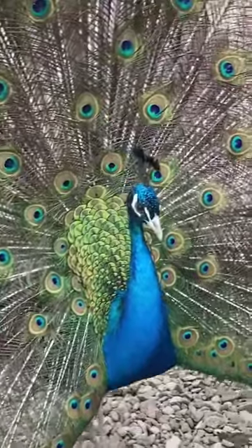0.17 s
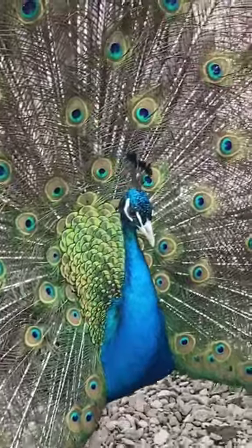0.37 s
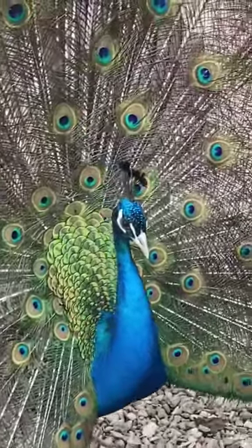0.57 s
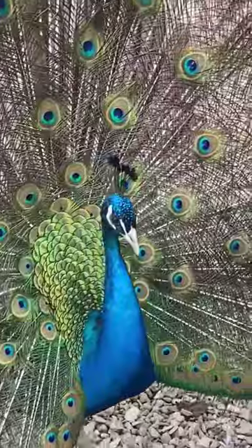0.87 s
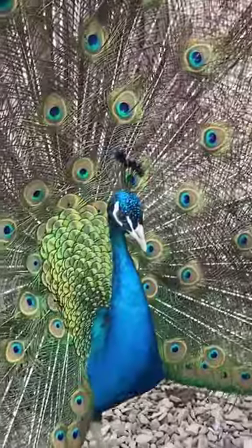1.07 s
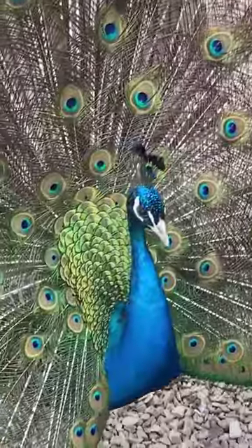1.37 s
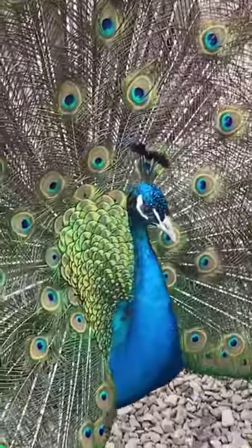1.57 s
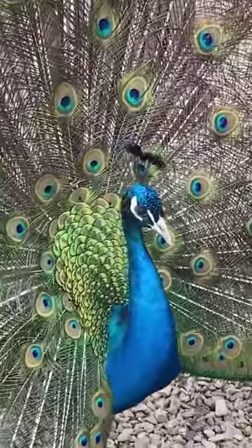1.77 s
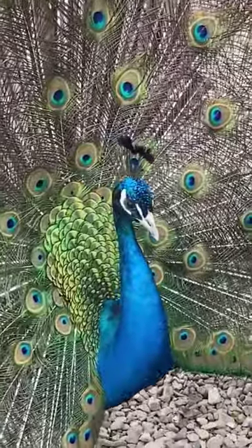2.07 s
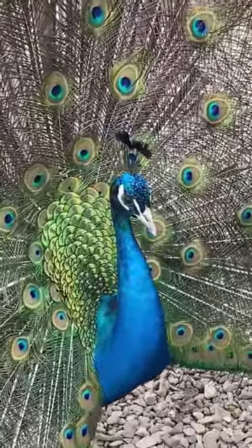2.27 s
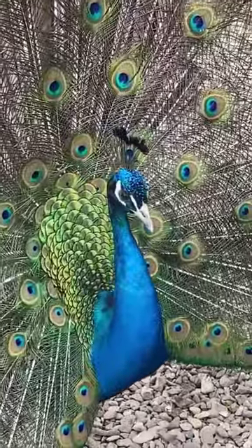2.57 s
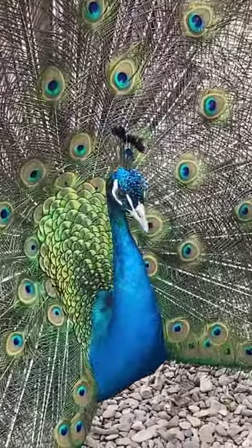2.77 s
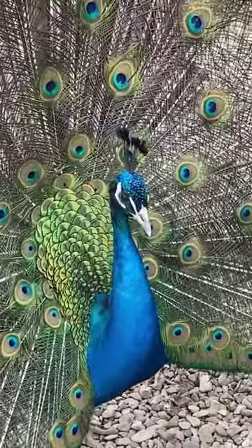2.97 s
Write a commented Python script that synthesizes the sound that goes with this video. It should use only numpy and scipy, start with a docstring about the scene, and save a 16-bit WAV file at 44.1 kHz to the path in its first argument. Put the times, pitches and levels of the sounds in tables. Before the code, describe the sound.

Peacock feathers rustle and tick drily close by while sparrows chirp around an open yard

```python
"""Throughout: a distant engine's drone, slowing slightly, the rumble of open air, a thin, high insect hiss.
At the start a far bird's hoarse note ends. Close to the microphone a peacock turns on gravel, train spread:
its feathers rustle and tick as shaped noise. Sparrows, whistles with bent pitch, then chirp around the yard,
soon joined by faint peeps, clear cheeps and, from about one second, chirps further off."""
import sys
import numpy as np
from scipy import signal
from scipy.fft import rfft, irfft, next_fast_len
from scipy.io import wavfile

SR = 44100
rng = np.random.default_rng(int(sys.argv[2]) if len(sys.argv) > 2 else 0)


def dump(signal):
    """Clip the signal to [-1, 1] and save it as 16-bit WAV at the path in sys.argv[1]."""
    limited = np.clip(np.atleast_2d(signal).T, -1, 1)
    pcm = np.round(limited * 32767).astype(np.int16)
    wavfile.write(sys.argv[1], SR, pcm)


N = 138033
T = np.arange(N) / SR

# distant engine: time_s, firing_rate_hz, level_db, octave_level_db
ENGINE_COURSE = [(0, 108.6, -36.5, -48), (.3, 106.1, -35, -39.5), (.65, 106.5, -29.5, -39.5),
                 (1.0, 107.4, -32.5, -40.5), (1.42, 106.8, -30.5, -37), (1.75, 106.5, -35, -36.5),
                 (2.2, 106.2, -35.5, -41), (2.6, 106.1, -33.5, -46), (2.93, 105.2, -30, -43),
                 (3.13, 105.2, -31, -39)]
# its weaker orders: multiple_of_firing_rate, level_re_mean_fundamental_db
ENGINE_ORDERS = [(.55, -15), (.7, -17), (1.39, -27), (2.35, -26.5), (3, -33), (5, -30.5)]
ENGINE_LAG_S, OCTAVE_LAG_S, ENGINE_PAN_DB = 0.00032, 0.001, 0.2
ENGINE_WAVER_DB, OCTAVE_WAVER_DB, ORDER_WAVER_DB, ENGINE_JITTER_HZ = 0.43, 1, 3, 0.382

# open-air spectrum: frequency_hz, relative_density_db (per Hz)
AIR_SPECTRUM = [(22, -23), (35, -6), (60, -1), (90, -3.5), (130, -7), (180, -4), (250, -9), (340, -12),
                (500, -12), (700, -18), (1300, -24), (2000, -32), (3300, -28.5), (5000, -37.5), (7500, -80),
                (11000, -84), (15000, -102.5)]
# swell below 120 Hz: time_s, gain_db
BASS_SWELL = [(0, 3), (.3, -0.5), (.65, 6), (.8, -6.5), (1.0, -4), (1.4, 5.5), (1.75, 0.5), (2.0, 1.5),
              (2.35, 1.5), (2.55, 2), (2.9, -2.5), (3.13, 3)]
# swell between 120 and 400 Hz: time_s, gain_db
RUMBLE_SWELL = [(0, 0), (.7, 0), (1.0, 1.5), (1.3, 3.5), (1.8, 1.5), (2.4, -2.5), (2.9, 3), (3.13, 3.5)]
# swell from 400 Hz up: time_s, gain_db
UPPER_SWELL = [(0, 1.5), (.5, 1.5), (1.0, 1.5), (1.8, 0), (3.13, 0)]
# left-right likeness of the air: frequency_hz, correlation (-1 to 1)
SIDE_LIKENESS = [(30, 1), (80, 0.78), (140, 0.96), (250, 0.24), (400, 0.31), (650, -0.69), (1100, 0.14),
                 (1600, 0.074), (2500, -0.16), (5000, 0.12), (15000, -0.22)]
AIR_DB, AIR_FLICKER_DB = -36, 1.5

# insect chorus: centre_hz, width_hz, level_db
INSECT_BANDS = [(5720, 440, -56), (6542, 580, -49.5), (7070, 370, -56)]
INSECT_FLICKER_DB = 1.7

# far bird's hoarse note, its partials: pitch_hz, level_db
HOARSE_PARTIALS = [(764, -56.5), (1150, -62), (1435, -53), (2010, -53), (2280, -53)]
HOARSE_END_S, HOARSE_RELEASE_S = .185, .035
HOARSE_WAVER, HOARSE_SAG_PER_S = .01, .25  # fractions of the pitch
HOARSE_ROUGH_HZ, HOARSE_BREATH_DB = 55, -3.5

# feathers brush together: centre_s, length_s (between 1/e points), relative_level_db
RUSTLES = [(0.009, 0.045, -42), (0.135, 0.11, -50), (0.285, 0.18, -54), (0.502, 0.14, -50),
           (0.632, 0.058, -52.5), (0.852, 0.1, -65), (1.07, 0.026, -61), (1.188, 0.3, -61.5),
           (1.477, 0.037, -59), (1.57, 0.043, -65), (1.696, 0.23, -62), (1.92, 0.11, -57),
           (2.068, 0.12, -56.5), (2.232, 0.2, -64), (2.375, 0.093, -53.5)]
# quills tick: start_s, relative_level_db, pan_db (positive is left)
QUILL_TICKS = [(0.0157, -43, 0), (0.0173, -26, 4), (.108, -28, 3), (0.1207, -21, 1), (.1463, -50, 3),
               (.2665, -30, 0), (.2852, -31, 7), (.322, -26.5, 12), (0.3293, -29, -6), (.4614, -35, -4),
               (.4852, -28, 5), (0.5185, -31, 15), (0.5253, -42, 2), (.5572, -38, 2), (0.5643, -30, -1),
               (.6367, -43, 0), (.8567, -35, -5), (0.9232, -25, -3), (0.943, -28, -1), (0.9583, -32.5, 3),
               (1.0675, -29, -4.5), (1.0745, -34, -5), (1.0837, -25.5, -2), (1.4598, -36, -6),
               (1.4716, -49, -1), (1.5592, -41, -2), (1.6323, -30, 4), (1.6847, -48, 4), (1.7793, -26, -4),
               (1.8808, -40, 8), (1.8976, -32, -14), (1.903, -35, 8), (1.933, -41, 6), (1.966, -26.5, 3),
               (2.054, -24.5, -2), (2.0669, -29, 0), (2.0745, -24, 4), (2.213, -40, -9), (2.241, -28.5, -5),
               (2.3588, -49, 6), (2.394, -25, -2), (3.0215, -34, -1)]
# colour of the feathers: frequency_hz, relative_density_db (per Hz)
FEATHER_COLOUR = [(1000, 10), (3000, 6.5), (6000, -1), (8500, 6), (10200, 8), (11800, -10.5), (14500, 6),
                  (16000, -9.5)]
RUSTLE_GRAIN_DB, RUSTLE_GRAINS_PER_S, RUSTLE_FLOOR_DB = 3, 170, -74.5
TICK_DECAY_S, TICK_DB, TICK_TAIL_S, TICK_TAIL_DB = .0008, -10, .004, -24

# Call shapes: time_s from the call's start (before stretching), pitch_hz, relative_level_db, roughness
# harsh chirp, a high lisp into a held note that starts to buzz
CHIRP_SHAPE = [(-.002, 6150, -14, .8), (.007, 5700, -6, 1), (.017, 5250, -7, 1.2), (.022, 4400, -7, .6),
               (.027, 4220, -4, .25), (.034, 4190, -1, .4), (.041, 4170, -1, 1), (.052, 4050, -4, 1.2),
               (.062, 3750, -13, .8)]
# the harsh chirp's clear, lower closing note, timed from the chirp's start
CHIRP_CLOSE_SHAPE = [(.049, 3020, -15, .2), (.054, 3240, -4, .15), (.06, 3330, 0, .12), (.068, 3280, 0, .2),
                     (.075, 3130, -4, .45), (.085, 2880, -13, .5)]
# clear cheep, two arches
CHEEP_SHAPE = [(0, 4000, -14, .15), (.02, 3850, -6, .15), (.031, 3000, -13, .1), (.043, 3330, 0, .05),
               (.054, 3220, 0, .05), (.068, 2930, -4, .05), (.076, 2850, -18, .1)]
# two-step fall of the chirps further off
FAR_SHAPE = [(0, 4200, -10, .5), (.008, 3950, -2, .45), (.028, 3800, -1, .7), (.04, 3600, -2, .9),
             (.048, 3320, -3, .7), (.058, 3200, -1, .3), (.072, 3100, -6, .6), (.083, 2950, -14, .7)]
# Call lists: start_s, relative_level_db, length_factor, pan_db (positive is left)
# harsh chirps
CHIRPS = [(.108, -41, 0.86, 1.5), (0.604, -40, 0.85, 1), (1.252, -40.5, 0.9, 1), (1.971, -41, 0.9, 0),
          (2.734, -41, 1.03, 1)]
# clear cheeps
CHEEPS = [(0.592, -38, 0.88, 2), (2.271, -38, 1, 2)]
# chirps from further off
FAR_CHIRPS = [(1.008, -43, 0.92, 0.5), (1.41, -53, 0.59, 7), (2.135, -52, 1.07, 8.5), (2.864, -44, 1, 0.5),
              (2.996, -50, 1.14, 0)]
RASP_PER_S, RASP_DB = 331, 9.5
BUZZ_HZ, BUZZ_DEPTH_RAD, BUZZ_JITTER = 350, 1.2, .25  # jitter is a fraction of the rate
OVERTONE_DB, OVERTONE_BELOW_HZ = -7.5, 4800
BIRD_LAG_S = .00007  # the calls reach the right side later

# faint arched peeps: start_s, length_s, top_pitch_hz (before waver), peak_level_db
PEEPS = [(0.519, 0.045, 3250, -53.5), (0.826, 0.037, 2570, -52), (0.876, 0.042, 2750, -54.5),
         (0.923, .04, 3180, -59), (1.651, .05, 4320, -54.5), (2.393, 0.04, 2600, -55),
         (2.924, 0.051, 1676, -48.5)]
PEEP_ARCH, PEEP_WAVER = 0.11, 0.05  # fractions of the top pitch

# echoes off the yard's walls: delay_s (before side skew), level_db
WALL_ECHOES = [(.027, -11), (.052, -10.5), (.074, -13)]
WALL_SKEW_S = .002
YARD_T60_S, YARD_ONSET_S, YARD_DULL_HZ = 1, 0.013, 6130
EARLY_T60_S, EARLY_DB = 0.12, 8.5  # early level relative to the long tail
CLOSE_DB, FAR_DIRECT_DB = -.5, -5
NEAR_WET_DB, CHEEP_WET_DB, FAR_WET_DB = 2.5, -8, 2
BIRD_TOP_HZ, CUTOFF_HZ = 9200, 15700


def from_db(db):
    """Decibels to an amplitude factor."""
    return 10 ** (np.asarray(db) / 20)


def rms_one(x):
    """Scale to an rms of 1 over all channels."""
    return x / np.sqrt(np.mean(x ** 2) + 1e-20)


def in_time(rows, t=T):
    """Columns of a curve, joined by straight lines."""
    s, *columns = np.transpose(rows)
    return [np.interp(t, s, column) for column in columns]


def at_hz(points, hz):
    """A spectrum read on a log-frequency axis."""
    point_hz, value = np.array(points).T
    return np.interp(np.log(hz + 1), np.log(point_hz), value)


def drift(rate):
    """Smooth random wandering, spread 1: noise through a two-pole low-pass at the rate in Hz."""
    pole = np.exp(-2 * np.pi * rate / SR)
    noise = rng.standard_normal(N + SR)
    settled = signal.lfilter([1], [1, -2 * pole, pole * pole], noise)[SR:]
    return rms_one(settled)


def panned(x, pan_db):
    """Left over right by the pan in dB."""
    return x * from_db([[pan_db / 2], [-pan_db / 2]])


def low_pass(x, order, hz):
    """Butterworth low-pass, dulling a sound."""
    return signal.sosfilt(signal.butter(order, hz, fs=SR, output="sos"), x)


def band_pass(x, low, high):
    """Butterworth band-pass between two frequencies."""
    return signal.sosfilt(signal.butter(2, [low, high], "band", fs=SR, output="sos"), x)


def noise_band(hz, width):
    """Diffuse stereo noise in one band, rms 1."""
    return rms_one(band_pass(rng.standard_normal((2, N)), hz - width / 2, hz + width / 2))


def engine():
    """A distant drone on the firing rate, its octave and weaker orders, reaching the left side first."""
    hz, db, octave_db = in_time(ENGINE_COURSE)
    turns = np.cumsum(hz + ENGINE_JITTER_HZ * drift(4.1)) / SR

    def partial(multiple, level_db, lag):
        """One order of the engine, later on the right by the lag in seconds."""
        side_turns = turns - hz * np.array([[0], [lag]])
        tone = np.sin(2 * np.pi * (multiple * side_turns + rng.random()))
        return np.sqrt(2) * from_db(level_db) * tone

    out = partial(1, db + ENGINE_WAVER_DB * drift(2.4), ENGINE_LAG_S)
    out = out + partial(2, octave_db + OCTAVE_WAVER_DB * drift(8.6), OCTAVE_LAG_S)
    for multiple, relative_db in ENGINE_ORDERS:
        level_db = db.mean() + relative_db + ORDER_WAVER_DB * drift(8.4)
        out = out + partial(multiple, level_db, ENGINE_LAG_S)
    return panned(out, ENGINE_PAN_DB)


def air():
    """Far noise in third-octave bands, each swelling, flickering and correlated between the sides."""
    edges = 20 * 2 ** (np.arange(30) / 3)
    white = rng.standard_normal((2, 2, N))
    (bass_db,), (rumble_db,), (upper_db,) = in_time(BASS_SWELL), in_time(RUMBLE_SWELL), in_time(UPPER_SWELL)
    out = 0
    for k, (low, high) in enumerate(zip(edges, edges[1:])):
        mid, side = band_pass(white[k % 2], low, high)  # neighbouring bands use separate noise
        hz = np.sqrt(low * high)
        alike = np.clip(at_hz(SIDE_LIKENESS, hz), -.97, .97)
        swell_db = bass_db if hz < 120 else rumble_db if hz < 400 else upper_db
        gain = from_db(at_hz(AIR_SPECTRUM, hz) + swell_db + AIR_FLICKER_DB * drift(8.4))
        out = out + gain * (np.sqrt(1 + alike) * mid + np.sqrt(1 - alike) * side * [[1], [-1]])
    return from_db(AIR_DB) * rms_one(out)


def insects():
    """Many insects merge into a high hiss: narrow bands of noise whose levels flicker."""
    out = 0
    for hz, width, db in INSECT_BANDS:
        out = out + noise_band(hz, width) * from_db(db + INSECT_FLICKER_DB * drift(6.4))
    return out


def hoarse_note():
    """A far bird's rough partials waver and sag together, each with a little breath noise."""
    sag = HOARSE_SAG_PER_S * (np.minimum(T, HOARSE_END_S) - HOARSE_END_S / 2)
    bend = 1 + HOARSE_WAVER * drift(25) - sag
    out = 0
    for hz, db in HOARSE_PARTIALS:
        rough_hz = HOARSE_ROUGH_HZ * np.array([drift(RASP_PER_S), drift(RASP_PER_S)])
        turns = np.cumsum(hz * bend + rough_hz, axis=1) / SR + rng.random((2, 1))
        tone = np.sqrt(2) * np.sin(2 * np.pi * turns)
        breath = from_db(HOARSE_BREATH_DB) * noise_band(hz, 200)
        out = out + from_db(db) * (tone + breath)
    return out * np.clip((HOARSE_END_S - T) / HOARSE_RELEASE_S, 0, 1)


def feathers():
    """Grainy brushing of the barbs and dry ticks of the quills: envelopes on noise of one bright colour."""
    brush = from_db(RUSTLE_FLOOR_DB)
    for centre, length, db in RUSTLES:
        brush = brush + from_db(db) * np.exp(-(2 * (T - centre) / length) ** 2)
    level = brush * rms_one(from_db(RUSTLE_GRAIN_DB * drift(RUSTLE_GRAINS_PER_S)))
    for s, db, pan_db in QUILL_TICKS:
        age = np.clip(T - s, 0, .2)
        snap = from_db(TICK_DB) * np.exp(-age / TICK_DECAY_S)
        tail = from_db(TICK_TAIL_DB) * np.exp(-age / TICK_TAIL_S)
        level = level + panned((T >= s) * from_db(db) * (snap + tail), pan_db)
    size = next_fast_len(N)
    colour = from_db(at_hz(FEATHER_COLOUR, np.fft.rfftfreq(size, 1 / SR)))
    noise = irfft(rfft(rng.standard_normal((2, size))) * colour, size)[:, :N]
    return level * rms_one(noise)


def calls(shape, rows):
    """A whistle with a weak octave for each row; roughness is a fast, uneven buzz in pitch and level."""
    out, shake, flutter = np.zeros((2, N)), drift(RASP_PER_S), drift(RASP_PER_S)
    buzz = BUZZ_DEPTH_RAD * np.sin(2 * np.pi * np.cumsum(BUZZ_HZ * (1 + BUZZ_JITTER * shake)) / SR)
    for s, db, length, pan_db in rows:
        t = (T - s) / length
        on = (t > shape[0][0]) & (t < shape[-1][0])
        hz, level_db, rough = in_time(shape, t[on])
        phase = 2 * np.pi * np.cumsum(hz) / SR + rough * (buzz[on] + shake[on])
        phase = phase - 2 * np.pi * hz * np.array([[0], [BIRD_LAG_S]])
        rasp_db = RASP_DB * rough * np.tanh(flutter[on])
        level = from_db(db + level_db + rasp_db) * signal.windows.tukey(len(hz), .1)
        low_note = 1 / (1 + (hz / OVERTONE_BELOW_HZ) ** 20)  # only the lower notes carry the octave
        octave = from_db(OVERTONE_DB) * low_note * np.sin(2 * phase)
        out[:, on] += panned(level * (np.sin(phase) + octave), pan_db)
    return np.sqrt(2) * out


def peeps():
    """Short wavering sine notes whose pitch and level rise and fall together."""
    out, waver = np.zeros(N), PEEP_WAVER * drift(RASP_PER_S)
    for s, length, top_hz, db in PEEPS:
        arch = np.sin(np.pi * np.clip((T - s) / length, 0, 1))
        hz = top_hz * (1 + waver + PEEP_ARCH * (arch - 1))
        out += np.sqrt(2) * from_db(db) * arch * np.sin(2 * np.pi * np.cumsum(hz) / SR)
    return out


def yard(x):
    """Early reflections and a longer, dull diffuse tail: decaying noise, different on each side."""
    t = T[:SR]
    late = from_db(-60 * t / YARD_T60_S)
    early = from_db(EARLY_DB - 60 * t / EARLY_T60_S)
    decay = (late + early) * np.minimum(t / YARD_ONSET_S, 1)
    response = rng.standard_normal((2, SR)) * decay / np.sqrt(np.sum(decay ** 2))
    return signal.fftconvolve(x, low_pass(response, 3, YARD_DULL_HZ), axes=1)[:, :N]


def walls(x):
    """A few distinct echoes; each reaches the two sides at slightly different times."""
    out = 0
    for delay, db in WALL_ECHOES:
        sides = []
        for side in x:
            skew = WALL_SKEW_S * rng.uniform(-0.977, 1)
            sides.append(np.interp(T - delay + skew, T, side, left=0))
        out = out + from_db(db) * np.array(sides)
    return out


def birds():
    """Near and far sparrows ring in the yard, the hoarse note stays dry; distance dulls them all."""
    harsh = calls(CHIRP_SHAPE, CHIRPS) + from_db(CLOSE_DB) * calls(CHIRP_CLOSE_SHAPE, CHIRPS)
    clear = calls(CHEEP_SHAPE, CHEEPS) + peeps()
    far = calls(FAR_SHAPE, FAR_CHIRPS)
    sent = from_db(NEAR_WET_DB) * harsh + from_db(CHEEP_WET_DB) * clear + from_db(FAR_WET_DB) * far
    echoes = yard(sent) + walls(harsh)
    direct = harsh + clear + from_db(FAR_DIRECT_DB) * far
    return low_pass(direct + echoes + hoarse_note(), 8, BIRD_TOP_HZ)


def scene():
    """The distant background, the birds around the yard and the peacock's feathers close by."""
    return engine() + air() + insects() + birds() + feathers()


def record(dry):
    """A steep low-pass cuts the top of the treble."""
    return signal.sosfilt(signal.ellip(10, .1, 80, CUTOFF_HZ, fs=SR, output="sos"), dry)


dry = scene()
out = record(dry)
dump(out)
```